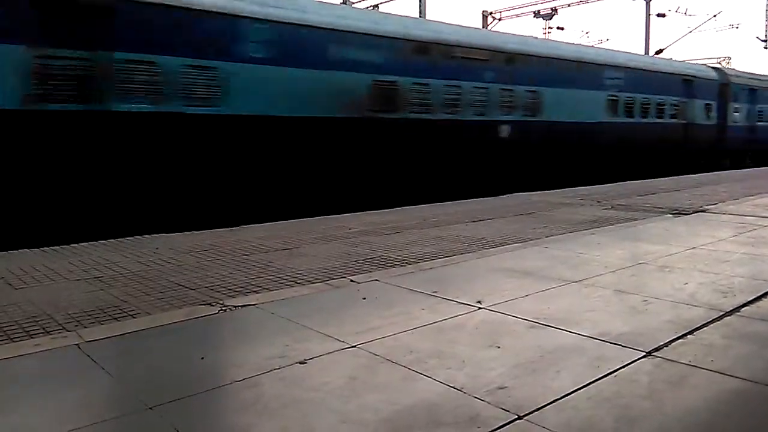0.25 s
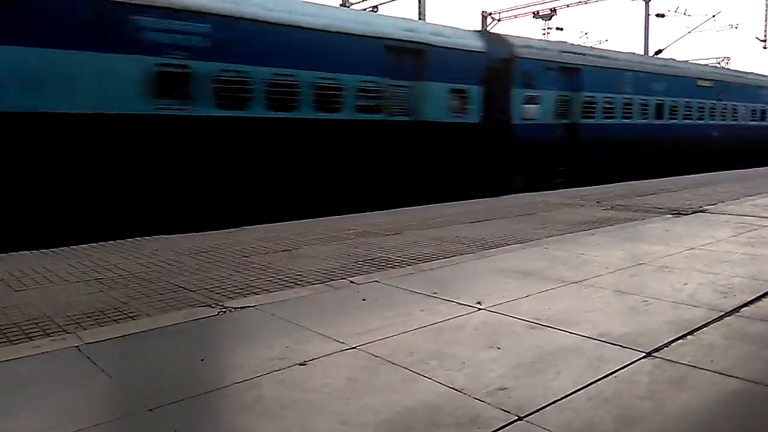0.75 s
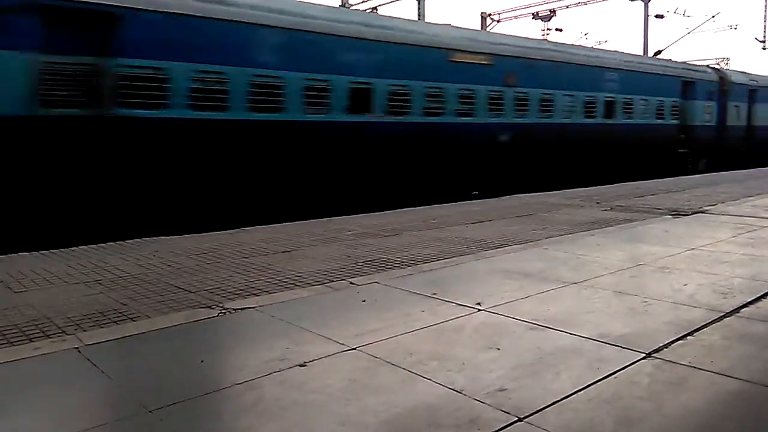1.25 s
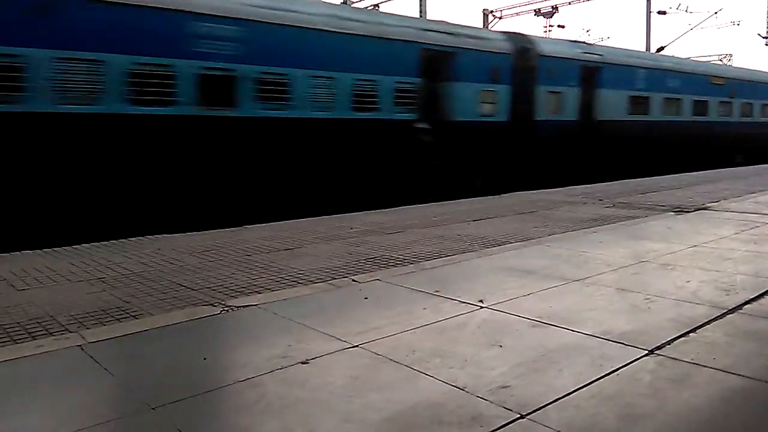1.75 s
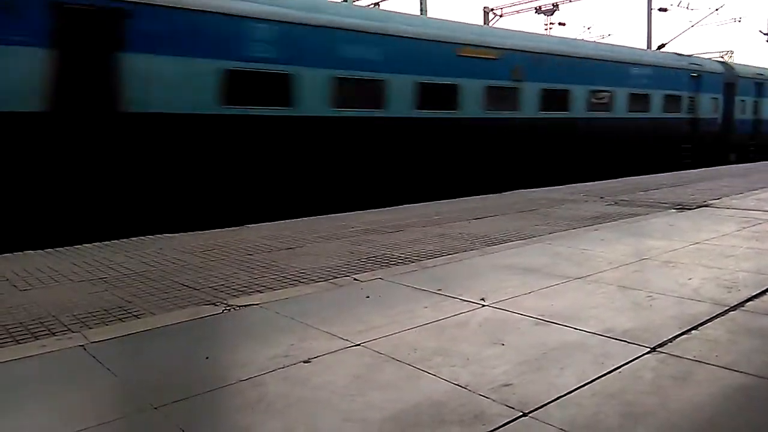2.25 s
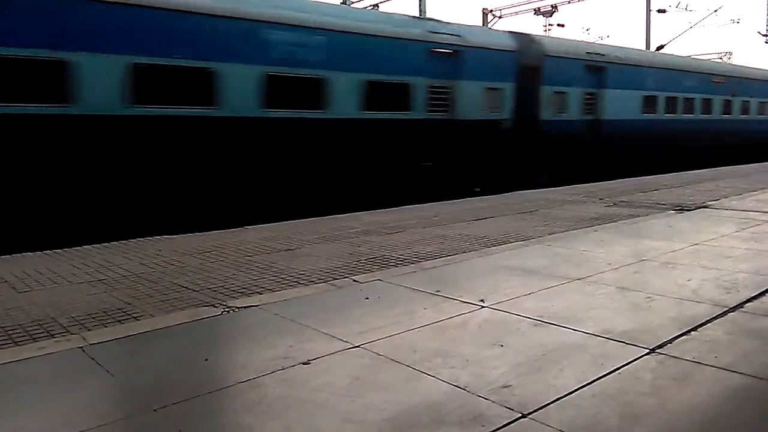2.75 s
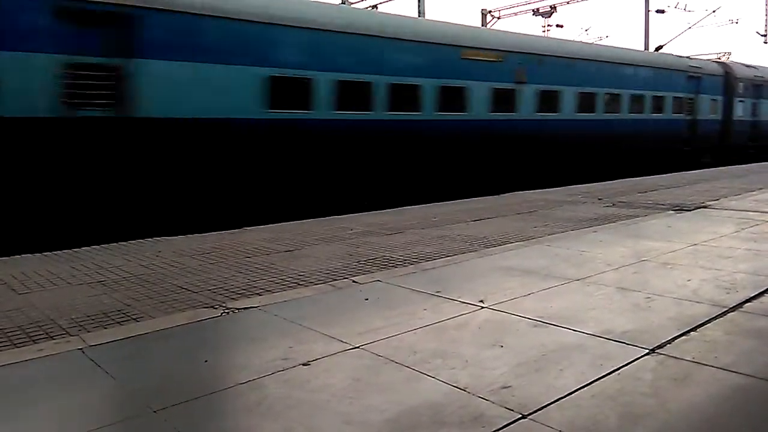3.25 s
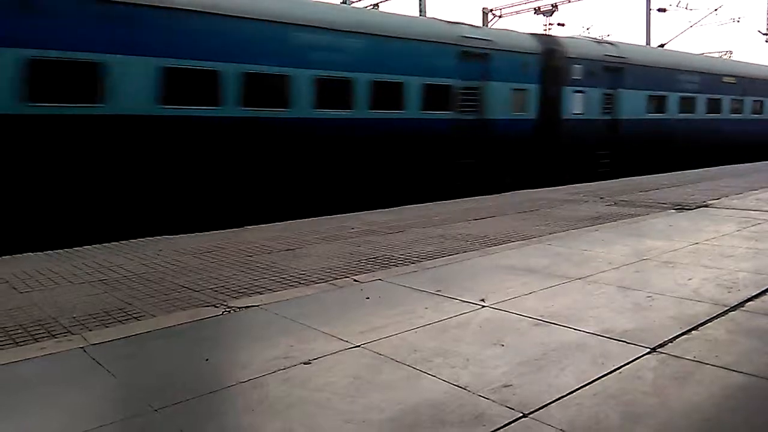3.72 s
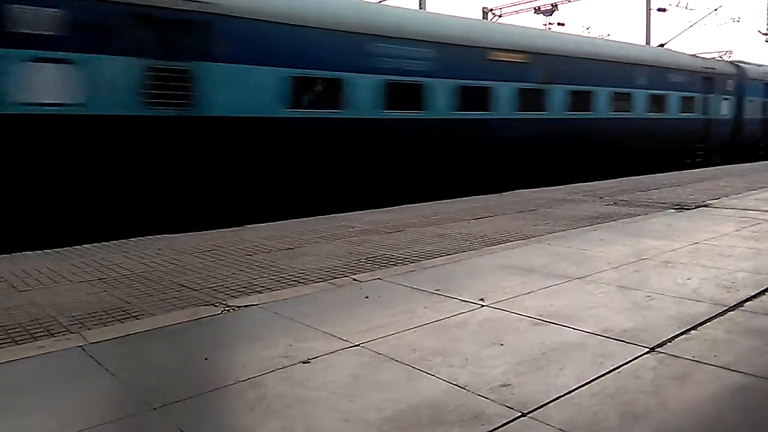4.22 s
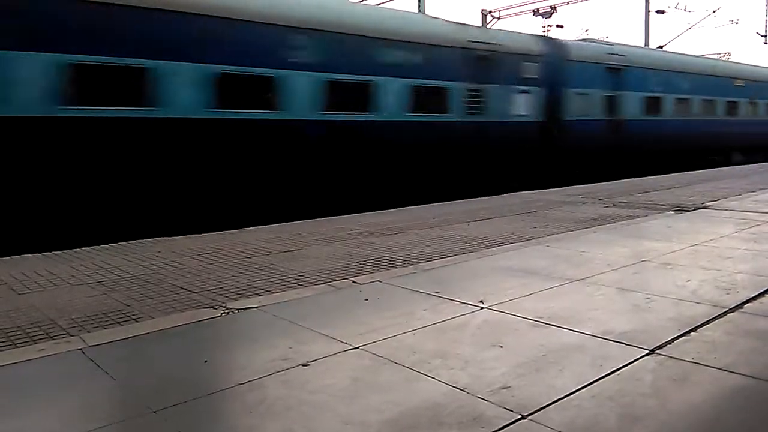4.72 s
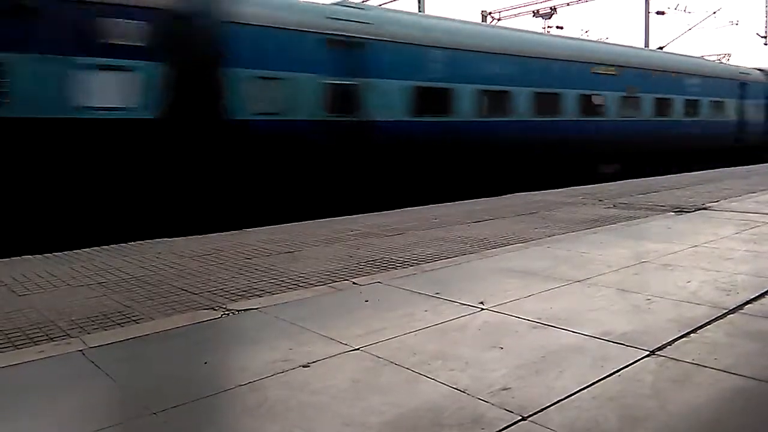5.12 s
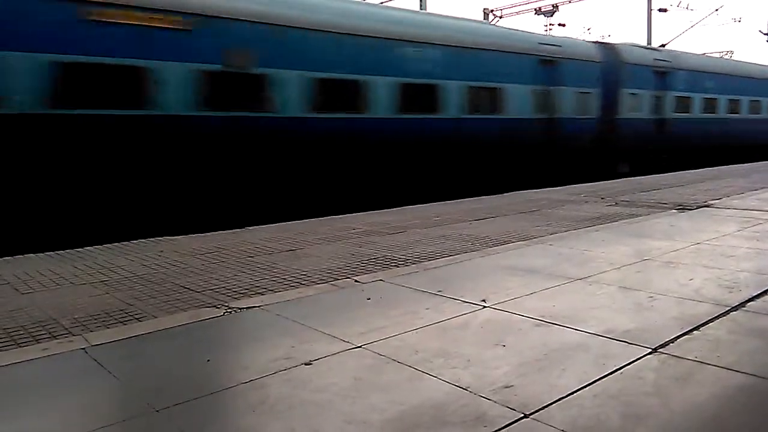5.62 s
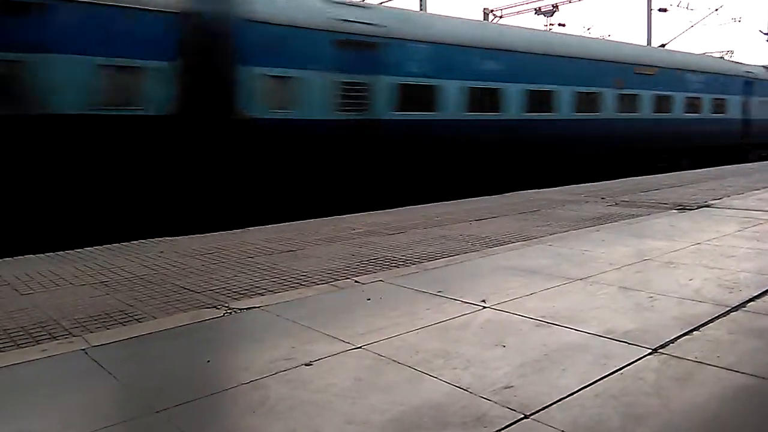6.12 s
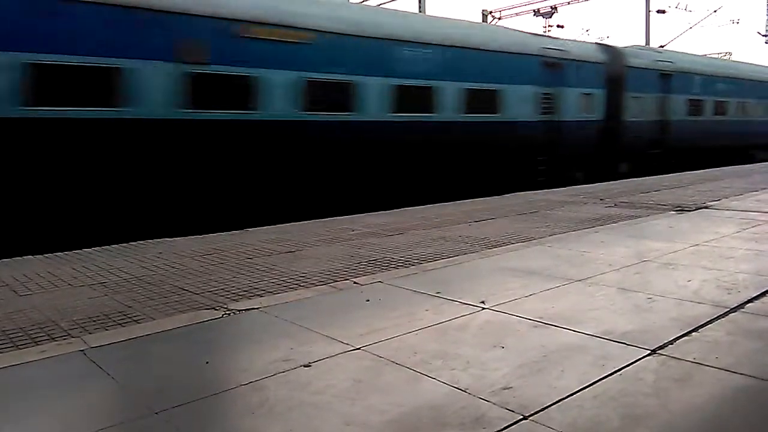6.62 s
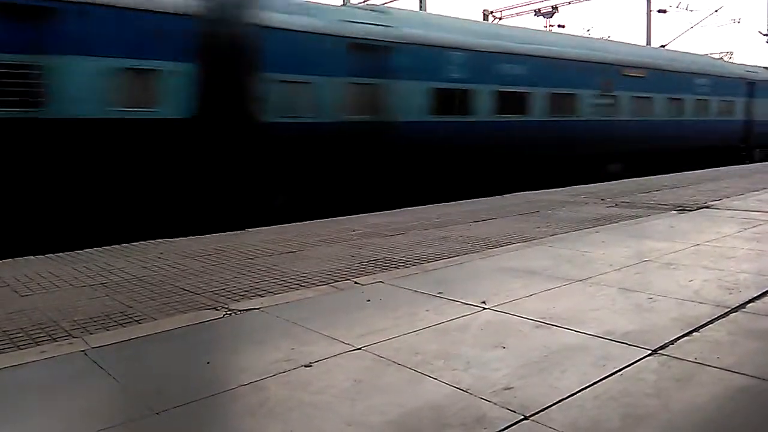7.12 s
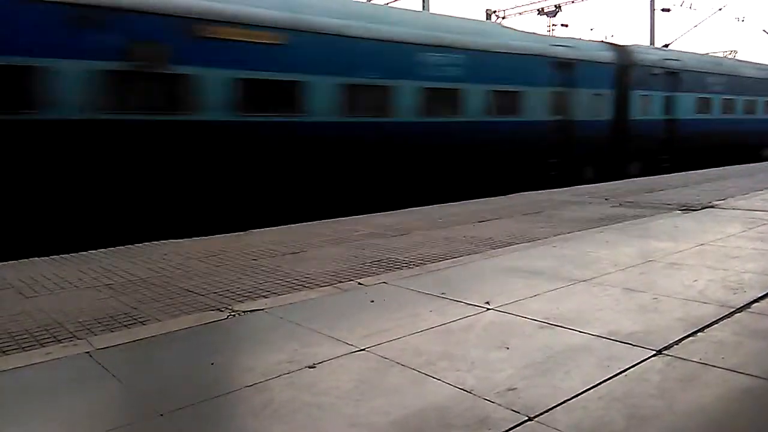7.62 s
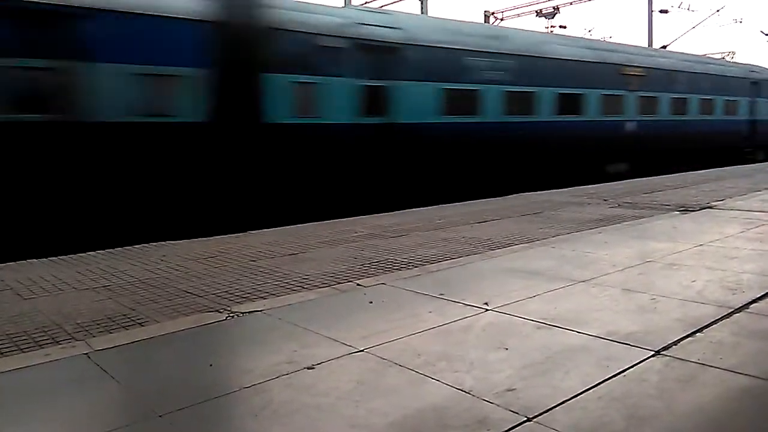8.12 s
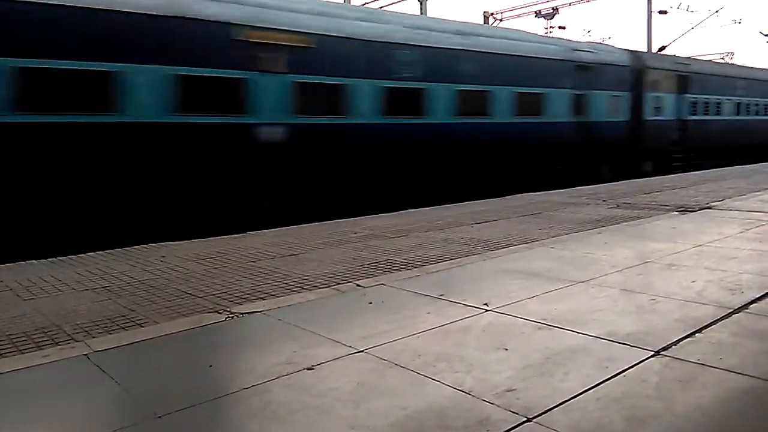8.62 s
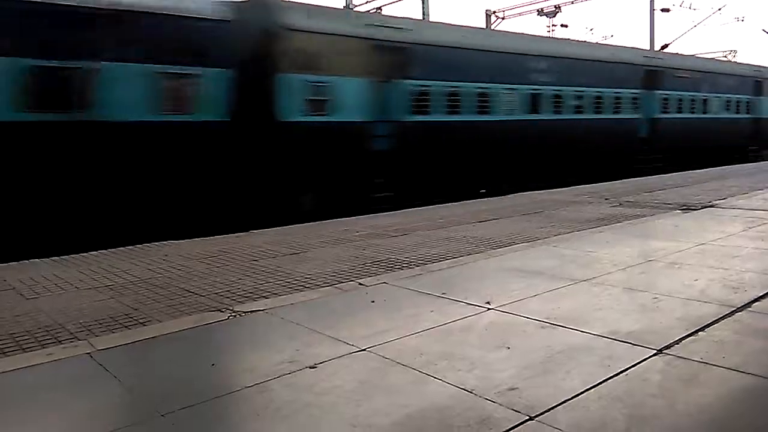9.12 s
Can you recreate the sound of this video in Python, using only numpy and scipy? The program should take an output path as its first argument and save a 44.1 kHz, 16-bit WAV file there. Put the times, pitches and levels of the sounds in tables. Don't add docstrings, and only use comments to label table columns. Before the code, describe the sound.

Fast train coaches pass close by, wheels knocking a rail joint in rhythmic double clacks, with bursts of roar, bright hiss and a brief squeak.

```python
import sys
import numpy as np
from scipy import signal
from scipy.fft import rfft, irfft, next_fast_len
from scipy.io import wavfile
from scipy.ndimage import uniform_filter1d, map_coordinates

SR = 44100
rng = np.random.default_rng(int(sys.argv[2]) if len(sys.argv) > 2 else 0)


def makeup_ratio(level_db):
    decades = np.asarray(level_db, float) / 20
    return 10 ** decades


def generate_wav(signal):
    frames = np.transpose(np.atleast_2d(signal))
    scaled = np.clip(frames, -1, 1) * 32767
    pcm = np.round(scaled).astype(np.int16)
    wavfile.write(sys.argv[1], SR, pcm)


N = 412776

# freq_hz, density_db_per_hz
ROAR_COLOUR = [(15, -65), (25, -25), (86, -6.5), (259, -7.5), (371, -2.5), (518, -6.5), (584, -8),
               (835, -9), (986, -12.5), (2620, -15.5), (2890, -19), (4330, -17.5), (5370, -20.5),
               (5910, -18), (7500, -34.5), (9750, -66), (16500, -120)]
# freq_hz, width_hz, lift_db
TRACK_RESONANCES = [(145, 30, 3), (280, 50, 2), (372, 40, 2.5), (505, 48, 2), (740, 54, 3), (2620, 150, 2),
                    (4290, 200, 3)]
# time_s, pitch_hz, level_db
HOWL = [(3.06, 505, -30), (3.12, 500, 1.5), (3.28, 494, 3.5), (3.6, 502, 2), (3.7, 503, -6), (3.84, 506, 3),
        (4.02, 513, -8), (4.3, 485, 1), (4.42, 495, -30)]
# peak_db, rise_s, hold_s, fall_db_s
AXLE_RAIL = (-39.8, 0.05, 0.0552, 85)
AXLE_RUMBLE = (-28.8, 0.0331, 0.0324, 130)
AXLE_BASS = (-42.5, -0.1, .07, 90)


def roar():
    rail_db = let_through(column=0, rest_db=-1.5, axle=AXLE_RAIL)
    rumble_db = let_through(column=1, rest_db=10, axle=AXLE_RUMBLE)
    bass_db = let_through(column=2, rest_db=3, axle=AXLE_BASS)

    def colour(hz):
        lift_db = sum(db / (1 + (2 * (hz - centre) / width) ** 2) for centre, width, db in TRACK_RESONANCES)
        return makeup_ratio(along(ROAR_COLOUR, hz) + lift_db)

    noise = filtered(patchy(patchy_db=3.0, bins=3, frames=6), colour)
    bass = filtered(noise, lambda hz: 1 - above(hz, 195, order=6))
    rail = filtered(noise, lambda hz: above(hz, 912, order=6))
    rumble = unit(noise - bass - rail)

    edge = filtered(noise, lambda hz: above(hz, 4380, order=16))
    edge_db = np.minimum(.5 * (rail_db + 33.5), 0)
    rail = (rail + (makeup_ratio(edge_db) - 1) * edge) / np.std(rail)

    howl_hz, howl_db = curves(HOWL)
    howl_level = makeup_ratio(howl_db + 3.5 * wobble(22))
    howl = howl_level * np.sin(2 * np.pi * np.cumsum(howl_hz + 6 * wobble(14)) / SR)

    shake_db = 0.87 * wobble(30)
    low = makeup_ratio(rumble_db - 0.6 + shake_db) * (rumble + howl)
    high = makeup_ratio(rail_db + 0.88 + shake_db + 0.63 * jolt()) * rail
    return low + high + makeup_ratio(bass_db) * unit(bass)


# start_s, hold_s, rail_roar_db, rumble_over_rail_db, bass_over_rail_db
OPENINGS = [(-.04, .11, -22, 8, -1.5), (0.581, .18, -18.5, 4, 0.5), (0.802, 0.13, -22, 10, -5),
            (0.926, .09, -21.5, 7.5, -6), (3.635, 0.103, -23, 8.5, -3), (3.877, 0.043, -26, 11, 1),
            (3.963, 0.123, -22.5, 9.5, 3), (4.518, 0.091, -21.5, 8.5, -3), (4.594, 0.16, -19, 9, -1),
            (6.675, 0.0692, -23, 4.5, -7), (6.894, 0.079, -23.5, 7.5, -3.5), (6.98, .11, -21, 8.5, -6),
            (7.663, .11, -22, 7.5, -5.5), (7.926, 0.044, -26.5, 5.5, 0.5), (8.001, 0.091, -21.5, 7, -4.5),
            (8.697, 0.1, -23.5, 8.5, -4.5), (8.923, 0.078, -24, 7, -1), (9.013, .11, -22, 9, -0.5)]
# start_s, track_roar_db, treble_left_between_bogies_db
REST = [(0, -45.5, -41), (.35, -51.5, -53), (.5, -43, -40), (1.15, -49.5, -49), (1.4, -48, -54),
        (2.33, -54, -70), (2.75, -49, -50), (3.15, -54, -64), (3.4, -52.5, -68), (3.8, -43, -45),
        (4.2, -45, -48.5), (4.48, -41.5, -40), (5.27, -53, -66), (6.33, -56, -71), (6.8, -47, -42),
        (7.25, -54.5, -53), (8.3, -55.5, -63), (9.36, -51.5, -65)]


def let_through(column, rest_db, axle):
    axle_db, rise_s, axle_hold_s, axle_fall_db_s = axle
    open_s, open_sag_db_s, close_db_s = 0.013, 26, 230
    held = []
    for s, place, (lift_db, *_) in places():
        second_db = -2.5 * (place % 2)
        held.append((s, axle_db + lift_db + second_db, rise_s, axle_hold_s, 0, axle_fall_db_s))
    opened = []
    for s, hold_s, rail_db, *over_db in OPENINGS:
        db = rail_db + [0, *over_db][column]
        opened.append((s - open_s / 2, db, open_s, hold_s, open_sag_db_s, close_db_s))
    rest = makeup_ratio(curves(REST)[0] + rest_db) ** 2
    return 10 * np.log10(rest + swells(held + opened))


# freq_hz, density_db_per_hz
HISS_COLOUR = [(3120, -31), (5300, -14.5), (5710, -5.5), (6190, -6), (6620, -1), (7960, -1.5), (9230, -2),
               (10600, -5.5), (12500, -7), (14100, -20.5)]


def hiss():
    level_db, bright_db = treads()
    noise = patchy(patchy_db=2.5, bins=4, frames=8)
    noise = unit(filtered(noise, lambda hz: makeup_ratio(along(HISS_COLOUR, hz))))
    top = filtered(noise, lambda hz: above(hz, 10580, order=12))
    return makeup_ratio(level_db + 1.34 + 2.0 * jolt()) * (noise - top + makeup_ratio(bright_db + 5.5) * top)


# peak_db, hold_s, sag_db_s, fall_db_s
TREADS = [
    (-33.5, 0.091, 19, 98),
    (-30, 0.14, 55, 130),
    (-34, 0.096, 16, 75),
    (-32.5, 0.17, 40, 196),
]
# start_s, level_db
FAR_JOINT = [(3.3, -56), (4.36, -44), (5.3, -56.5), (6.29, -64), (7.29, -43.5), (7.4, -47.5), (8.32, -58),
             (8.44, -51)]


def treads():
    rise_s, nearing_s = .024, 0.11
    passing, nearing = [], []
    for s, place, (_, hiss_db, linger_s) in places():
        db, hold_s, sag_db_s, fall_db_s = TREADS[place]
        hold_s = hold_s + linger_s * (place == 3)
        passing.append((s, db + hiss_db, rise_s, hold_s, sag_db_s, fall_db_s))
        if place == 0:
            nearing.append((s - nearing_s, -51.5, nearing_s / 2, nearing_s, 0, 210))
    farther = [(s, db, .015, .04, 0, 150) for s, db in FAR_JOINT]
    near = swells(passing)
    far = makeup_ratio(curves(REST)[1]) ** 2 + swells(nearing + farther)
    opened = np.clip((let_through(column=0, rest_db=-1, axle=AXLE_RAIL) + 41) / 18, 0, 1)
    top = near * makeup_ratio(-6 - 2 * opened) ** 2 + far * makeup_ratio(-12) ** 2
    return 10 * np.log10(near + far), 10 * np.log10(top / (near + far))


# pitch_hz, level_db, t60_s, strength_column (as in axles())
RAIL_MODES = [(372, -4, .14, 1), (738, -3, .08, 0), (890, -8, .08, 0), (1130, -15, .07, 0),
              (2110, -22, .05, 0)]
# start_s, peak_db, pitch_hz
THUMPS = [(0.299, -33, 151), (0.403, -21.5, 153), (1.169, -28.5, 259), (1.218, -31.5, 271.5),
          (1.379, -26.5, 274), (2.389, -33, 310), (3.399, -30.5, 508), (4.348, -24, 181),
          (4.42, -25.5, 202)]


def knocks():
    out = np.zeros(N + SR)
    chances = rng.standard_normal((len(axles()), len(RAIL_MODES), 2))
    for (s, *strength_db), chance in zip(axles(), chances):
        start_s = max(s - 0.00399, 0)
        for (hz, db, t60, column), (tune, vary) in zip(RAIL_MODES, chance):
            peak_db = strength_db[round(column)] + db + 1.4 + 1.5 * vary
            add(out, start_s, peak_db, hz * (1 + 0.026 * tune), t60, attack=0.0039)
    for s, db, hz in THUMPS:
        add(out, s, db + .5, hz, t60=0.097, attack=0.00195)
    return out[:N]


def add(out, s, db, hz, t60, attack):
    t = np.arange(SR // 4) / SR
    envelope = makeup_ratio(db - 60 * t / t60) * (1 - np.exp(-t / attack))
    out[round(s * SR):][:len(t)] += envelope * np.sin(2 * np.pi * hz * t)


# pitch_hz, level_db, t60_s, strength_column (as in axles())
WHEEL_MODES = [(5820, 0, .36, 2), (6578, -2, .3, 4), (8367, -4, .3, 4), (9120, 0, .42, 3),
               (11238, -4, .35, 4), (12300, -11, .25, 4), (12750, -13, .25, 4)]


def ring():
    out, t = np.zeros(N), np.arange(SR // 2) / SR
    for hz, db, t60, column in WHEEL_MODES:
        beat = wobble(70)
        phase = 2 * np.pi * np.cumsum(hz + 11 * wobble(40)) / SR
        swell = np.zeros(N + SR)
        for s, *strength_db in axles():
            decay = makeup_ratio(strength_db[round(column)] - 60 * t / t60)
            swell[max(round(s * SR), 0):][:len(t)] += decay * (1 - np.exp(-t / 0.021))
        out += makeup_ratio(db + 6 + 3.3 * beat) * swell[:N] * np.sin(phase)
    return out * makeup_ratio(np.minimum(treads()[0] + 38, 0))


# start_s, upper_knock_db, lower_knock_db, high_ring_db, side_ring_db
FIRST_AXLES = [(.455, -29.5, -23, -39.5, -50), (.81, -19.5, -9, -36.5, -50), (1.46, -29, -21, -47, -44.5),
               (1.804, -23.5, -45, -55, -39), (2.472, -23.5, -41, -47.5, -49), (2.815, -20, -22, -45, -51),
               (3.484, -23, -16, -41, -52), (3.833, -21, -14.5, -43, -52), (4.504, -16.5, -18, -34, -38),
               (4.845, -19.5, -15.5, -49.5, -39.5), (5.51, -23, -21, -35, -36),
               (5.845, -23.5, -19.5, -41, -50), (6.518, -25, -16.5, -37, -51), (6.865, -19, -22, -35, -52),
               (7.538, -25, -18.5, -47, -43.5), (7.872, -14, -37, -57, -48), (8.557, -18, -19.5, -39, -50),
               (8.888, -14.5, -25, -50, -49)]
# start_s, upper_knock_db, low_ring_db, high_ring_db, side_ring_db
SECOND_AXLES = [(-.07, -24, -44, -37.5, -52), (.583, -11.5, -27, -32, -49), (.938, -3, -47, -49, -49.5),
                (1.604, -18, -36, -40.5, -40), (1.946, -15, -44, -33, -38), (2.611, -14, -43, -38, -36),
                (2.951, -13.5, -45, -33, -34), (3.625, -14, -29.5, -38, -38),
                (3.967, -13, -29.5, -25, -33.5), (4.634, -13, -46, -52, -47), (4.974, -17, -41, -44, -46),
                (5.646, -19, -37, -32.5, -34), (5.984, -19, -44, -47, -51), (6.658, -13.5, -36, -37, -36),
                (6.986, -6.5, -26, -30, -48), (7.671, -9.5, -31, -25.5, -31.5),
                (8.009, -9.5, -31, -27, -49.5), (8.685, -12, -26, -34, -41), (9.026, -4, -36.5, -42, -38)]


def axles():
    first = [(s, upper, lower, -46.5, *rings) for s, upper, lower, *rings in FIRST_AXLES]
    second = [(s, upper, upper - 5, *rings) for s, upper, *rings in SECOND_AXLES]
    return sorted(first + second)


# held_roar_db, hiss_db, hiss_lingers_s
COUPLINGS = [(-5, 1.5, -.02), (-1, -1.5, -0.015), (1.7, -0.47, 0.076), (-0.2, -1, -0.013),
             (0.7, -0.8, -0.025), (-0.2, -0.7, -.01), (-0.3, 0, -0.034), (0, 0.1, -0.023),
             (1.3, 0.14, -.03), (-0.74, 0.1, -0.035)]


def places():
    lead_s = .015
    return [(s - lead_s, (k + 3) % 4, COUPLINGS[(k + 3) // 4]) for k, (s, *_) in enumerate(axles())]


def jolt():
    out, t = np.zeros(N + SR), np.arange(SR // 8) / SR
    for s, *_ in axles():
        out[max(round(s * SR), 0):][:len(t)] += makeup_ratio(-60 * t / .2) * (1 - np.exp(-t / .002))
    return out[:N]


# start_s, peak_db, t60_s
SQUEAKS = [(4.1894, -31, 0.2), (4.2138, -28.5, 0.18), (4.2517, -39, 0.17), (4.279, -21.5, 0.13),
           (4.3294, -30.5, 0.2), (4.3544, -36.5, 0.2), (4.4059, -27, 0.2), (4.4553, -29, 0.28)]
# freq_hz, density_db_per_hz
LINK_COLOUR = [(1100, -18.5), (1600, -2), (1800, 3), (2200, -4.5), (2700, -37.5)]


def squeaks():
    swell, t = np.zeros(N + SR), np.arange(SR // 4) / SR
    for s, db, t60 in SQUEAKS:
        swell[round(s * SR):][:len(t)] += makeup_ratio(db - 9.5 - 60 * t / t60) * (1 - np.exp(-t / 0.0017))
    noise = filtered(rng.standard_normal(N), lambda hz: makeup_ratio(along(LINK_COLOUR, hz)))
    return swell[:N] * unit(noise)


def swells(rows):
    out, t = np.zeros(N + 2 * SR), np.arange(SR // 2) / SR
    for s, db, rise_s, hold_s, sag_db_s, fall_db_s in rows:
        level_db = db - sag_db_s * t - fall_db_s * np.maximum(t - hold_s, 0)
        rise = 1 - np.exp(-(t / rise_s) ** 2)
        out[round((s + 1) * SR):][:len(t)] += (makeup_ratio(level_db) * rise) ** 2
    return out[SR:SR + N]


def unit(x):
    return x / np.sqrt(np.mean(x ** 2) + 1e-20)


def along(points, hz):
    f, v = np.transpose(points)
    return np.interp(np.log(hz + 1), np.log(f + 1), v)


def curves(rows):
    s, *cols = np.vstack(rows).T
    return [np.interp(np.arange(N) / SR, s, c) for c in cols]


def wobble(rate):
    knots = rng.standard_normal(int(N * rate / SR) + 4)
    return map_coordinates(knots, [np.arange(N) * rate / SR])


def filtered(x, response):
    m = next_fast_len(N + SR // 2)
    return irfft(rfft(x, m) * response(np.fft.rfftfreq(m, 1 / SR)), m)[..., :N]


def patchy(patchy_db, bins, frames):
    z = signal.stft(rng.standard_normal(N + 512), nperseg=512)[2]
    field = uniform_filter1d(rng.standard_normal(z.shape), size=bins, axis=0)
    field = uniform_filter1d(field, size=frames, axis=1)
    return signal.istft(z * makeup_ratio(patchy_db * unit(field)), nperseg=512)[1][:N]


def above(hz, edge_hz, order):
    return 1 / (1 + (edge_hz / (hz + 1)) ** order)


def scene():
    return np.tile(roar() + knocks() + squeaks() + hiss() + ring(), (2, 1))


# freq_hz, share
REFILL = [(3800, 0), (4800, .06), (7000, .34), (9500, .36), (14000, .14)]


def refill(mid):
    frame, offset = 1024, 594
    hz, _, z = signal.stft(mid[offset:], SR, nperseg=2 * frame)
    strength = np.sqrt(np.abs(uniform_filter1d(np.abs(z) ** 2, size=40, axis=0)))
    band = (hz // 760).astype(int)
    draw = rng.random((band.max() + 1, z.shape[1]))
    draw = np.minimum(draw, np.roll(draw, 1, axis=0))[band]
    filled = draw < .5 * along(REFILL, hz)[:, None]
    noise = strength * filled * np.exp(2j * np.pi * rng.random(z.shape))
    return np.pad(signal.istft(noise, SR, nperseg=2 * frame)[1], (offset, 0))[:N]


def top_cut(x):
    return signal.sosfilt(signal.butter(12, 14290, fs=SR, output="sos"), x)


def record(dry):
    mid = dry[0] / (1 + np.abs(dry[0] / .82) ** 5) ** (1 / 5)
    mid = filtered(mid, lambda hz: above(hz, 46.5, order=4) * (hz < 14290))
    side = refill(mid)
    return top_cut(np.array([mid + side, mid - side]))


dry = scene()
out = record(dry)
generate_wav(out)
```